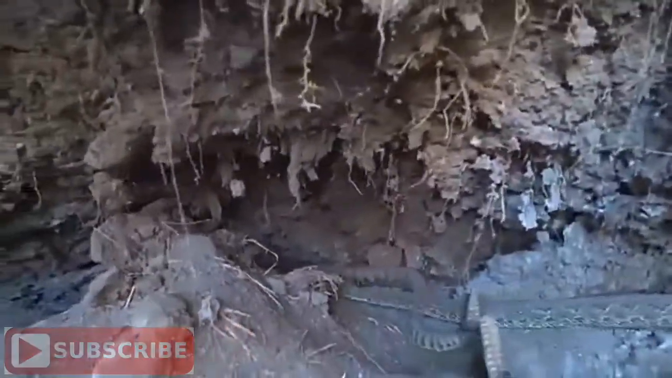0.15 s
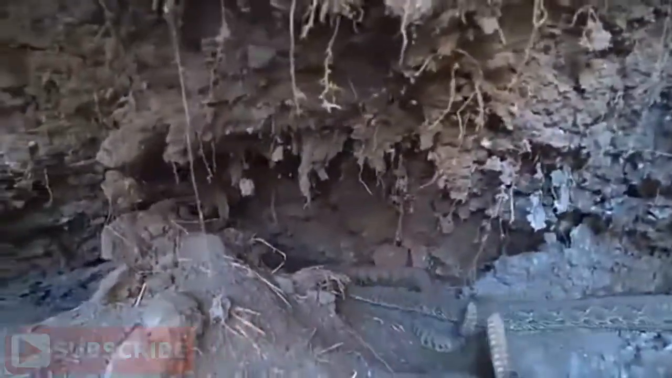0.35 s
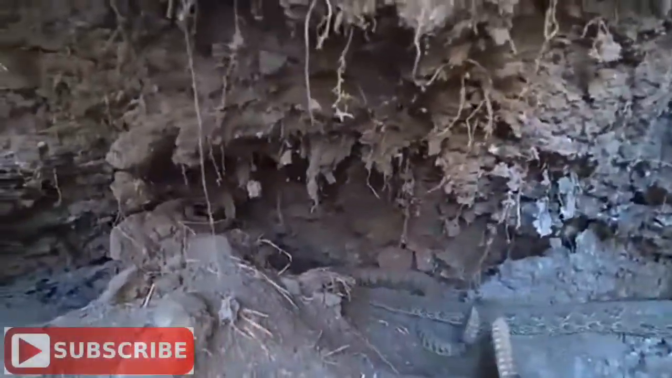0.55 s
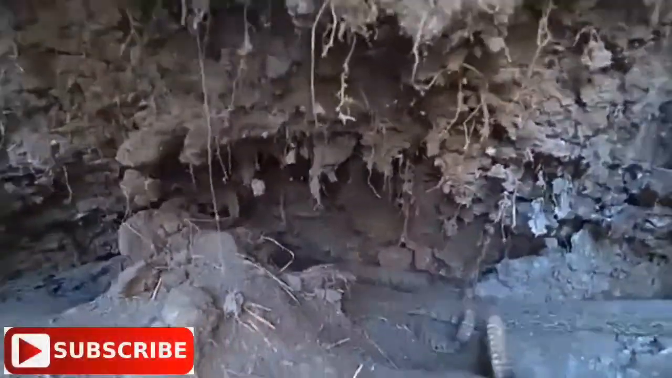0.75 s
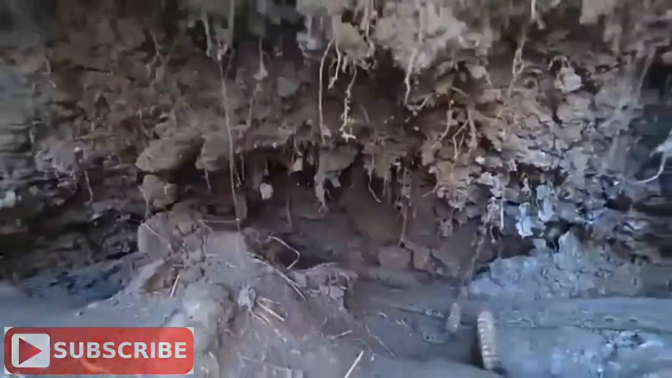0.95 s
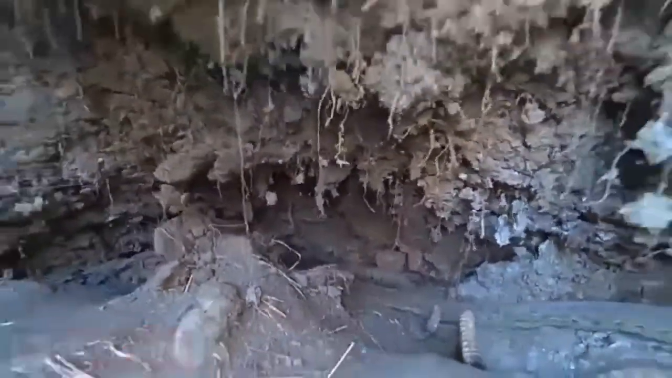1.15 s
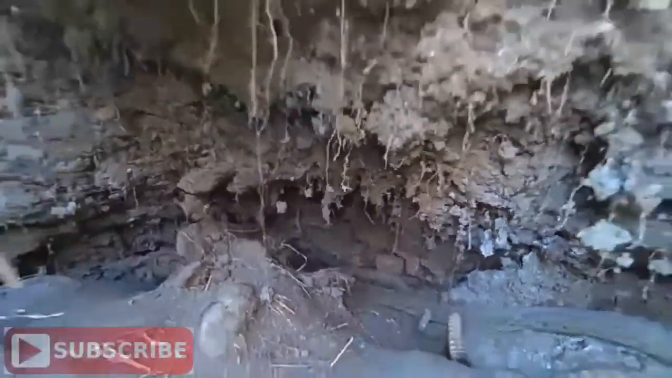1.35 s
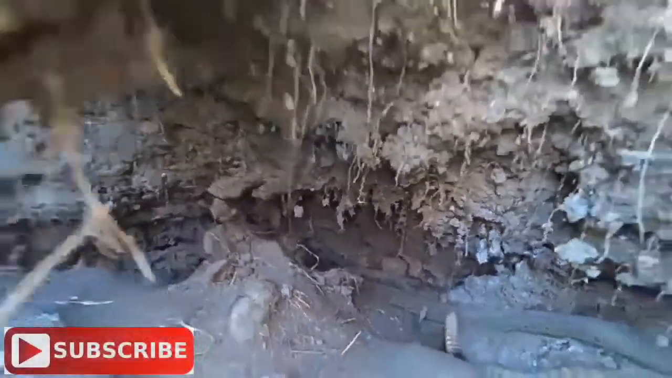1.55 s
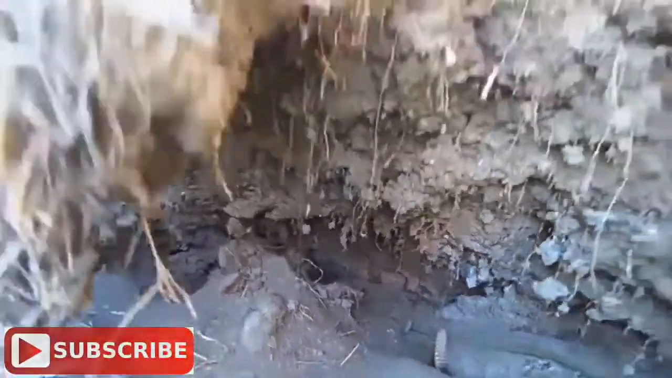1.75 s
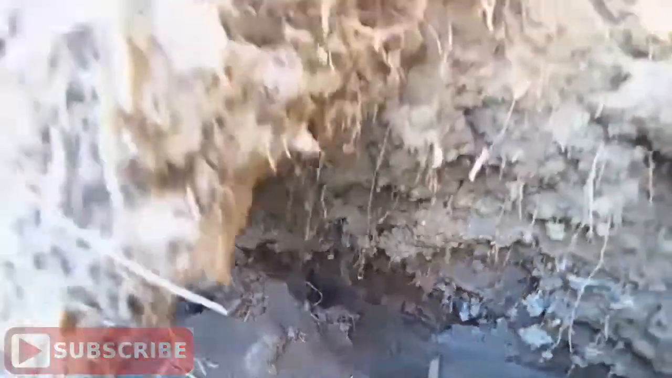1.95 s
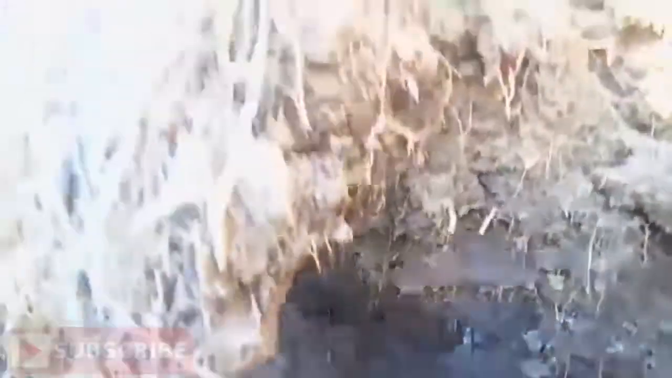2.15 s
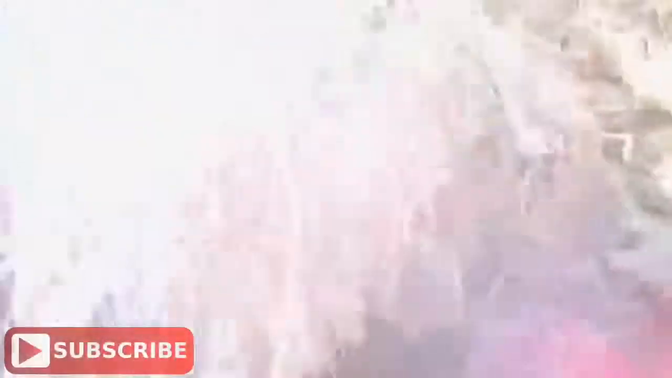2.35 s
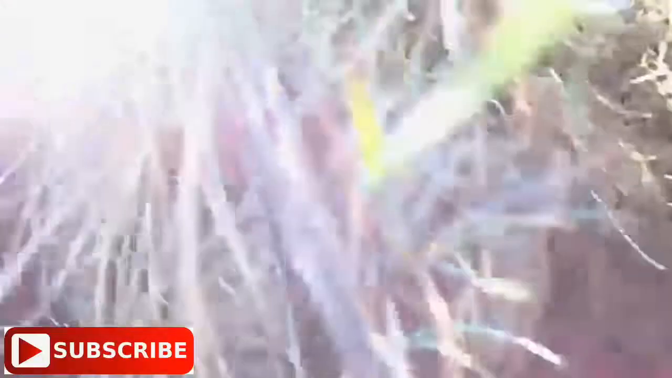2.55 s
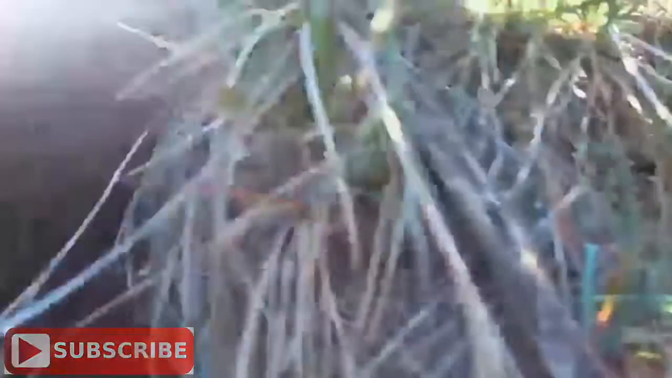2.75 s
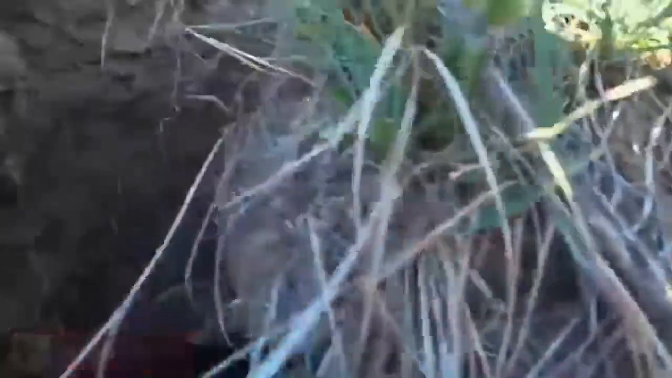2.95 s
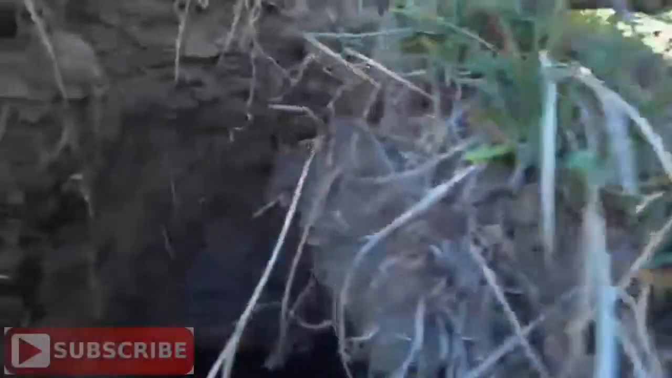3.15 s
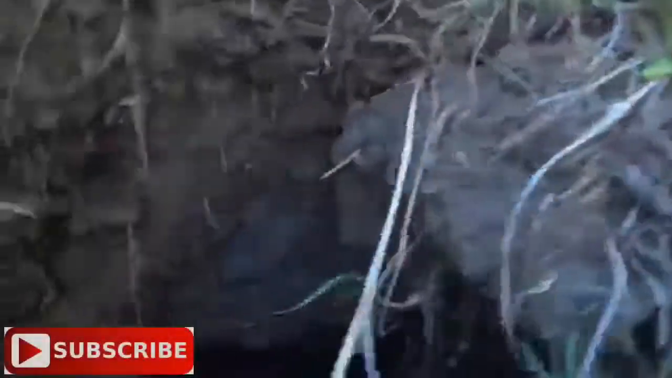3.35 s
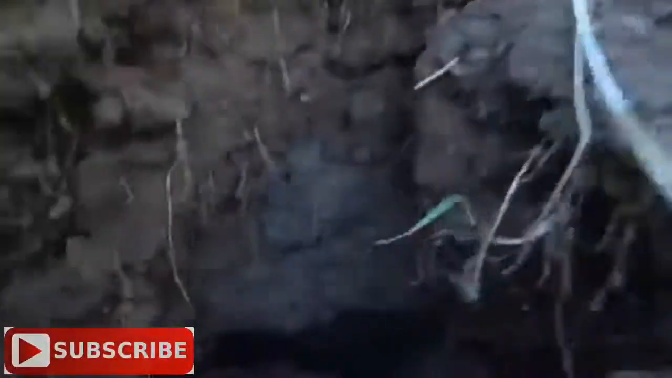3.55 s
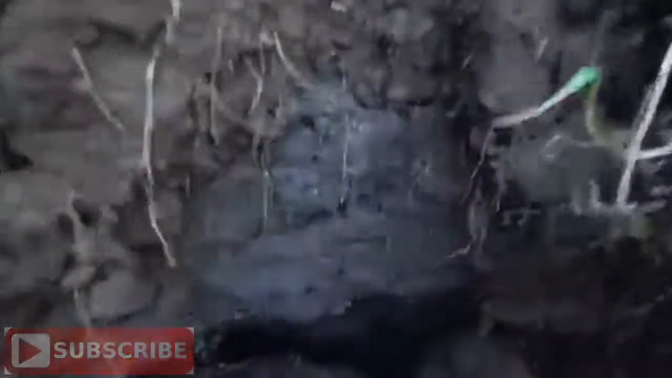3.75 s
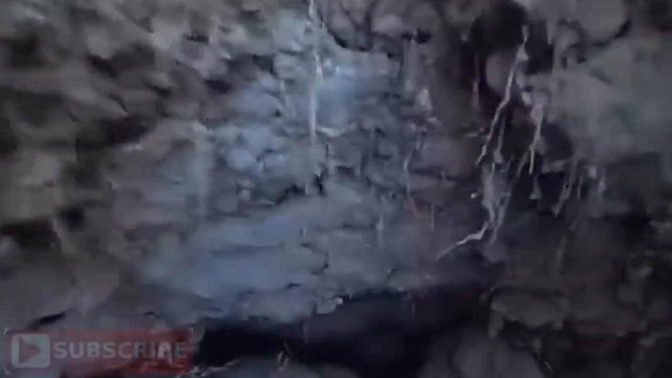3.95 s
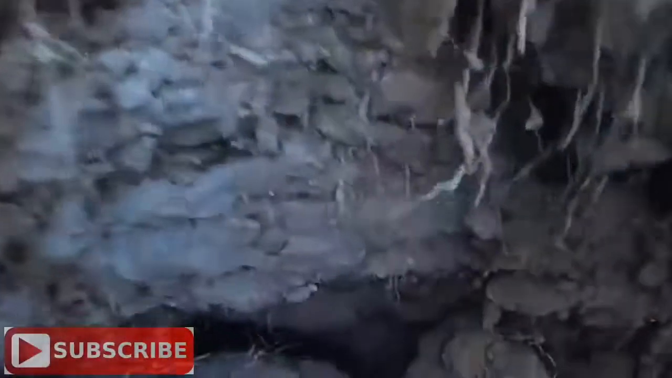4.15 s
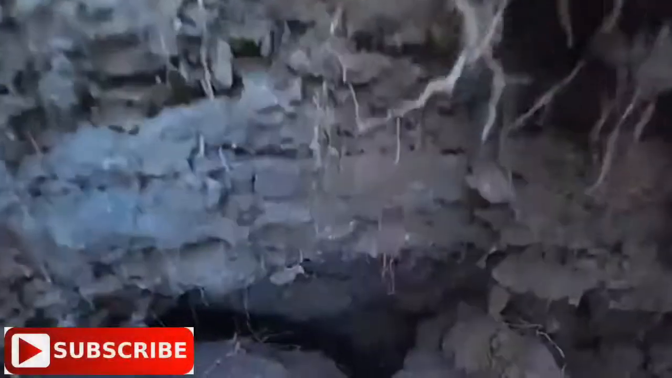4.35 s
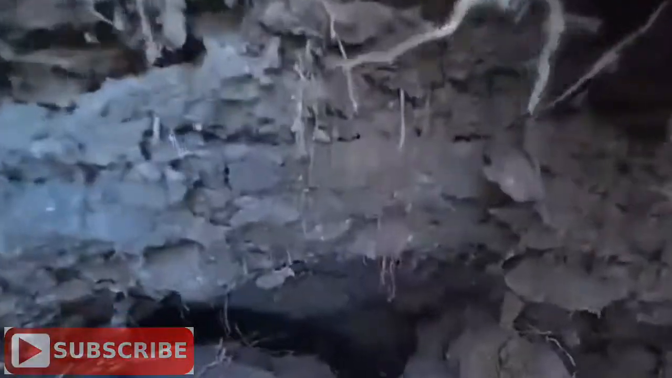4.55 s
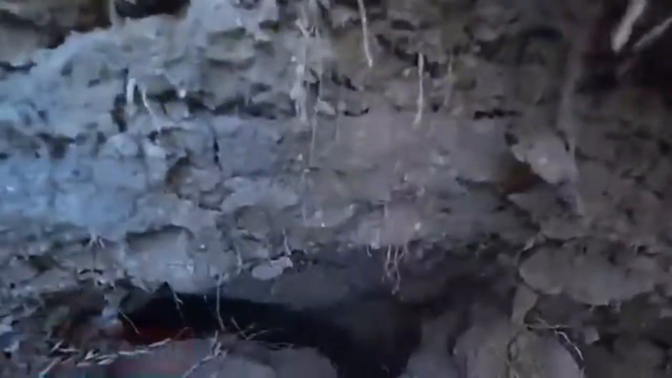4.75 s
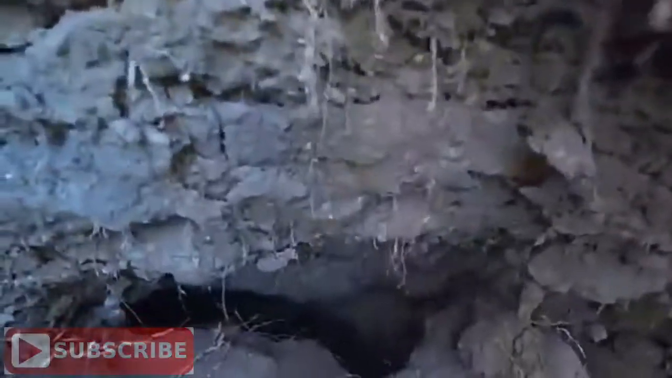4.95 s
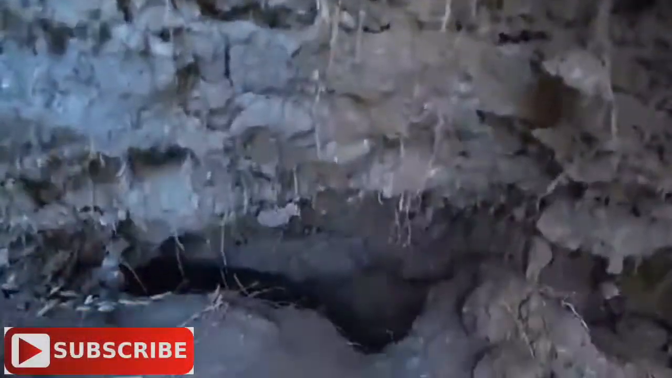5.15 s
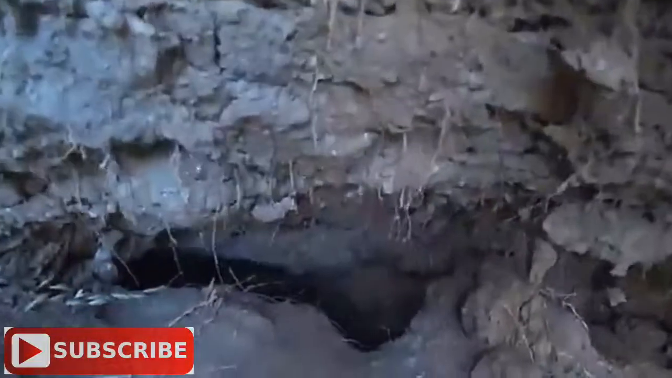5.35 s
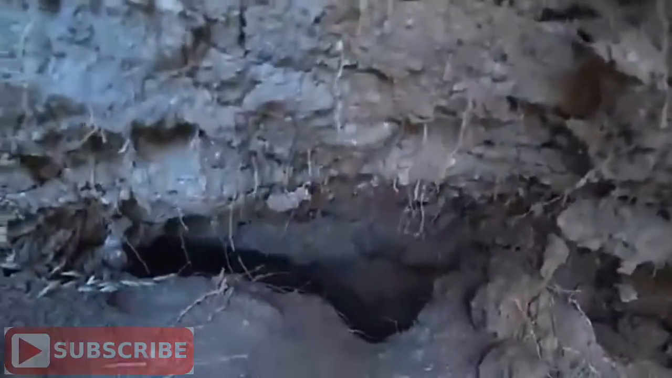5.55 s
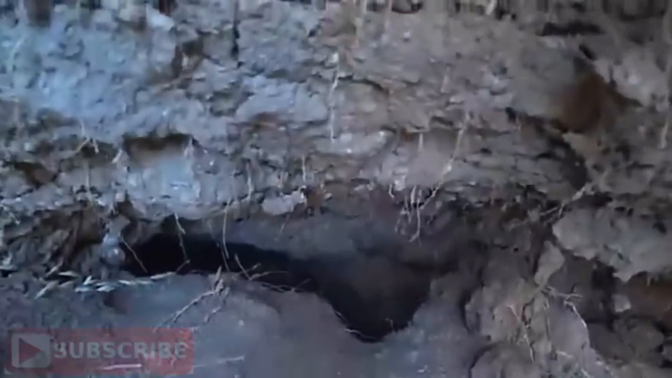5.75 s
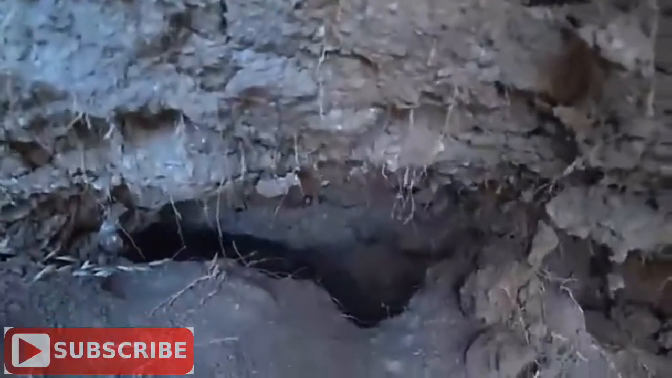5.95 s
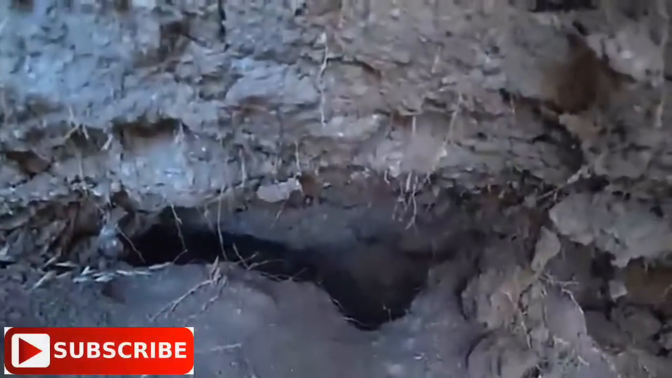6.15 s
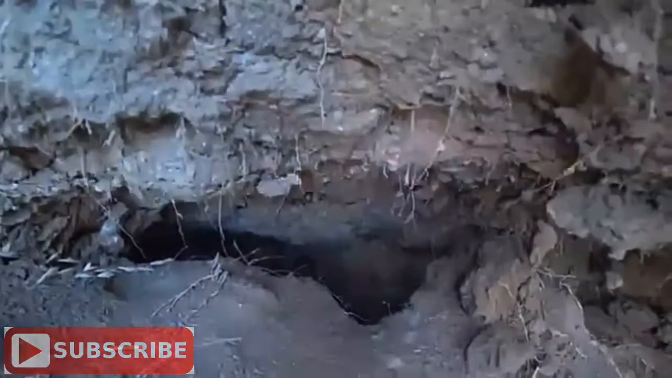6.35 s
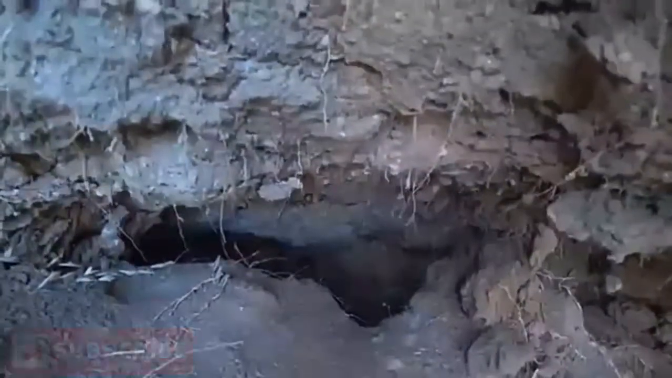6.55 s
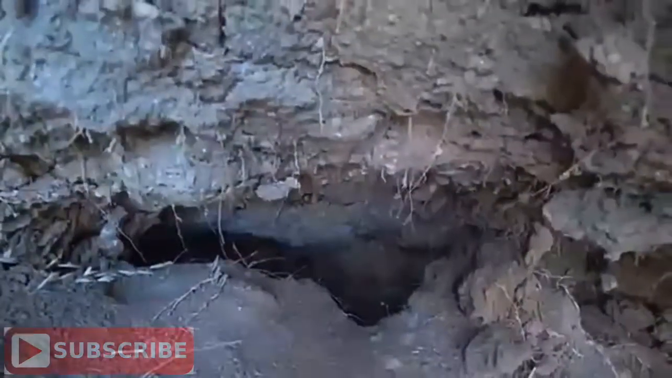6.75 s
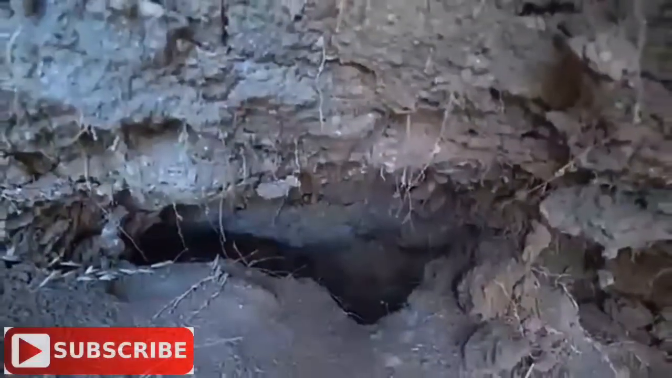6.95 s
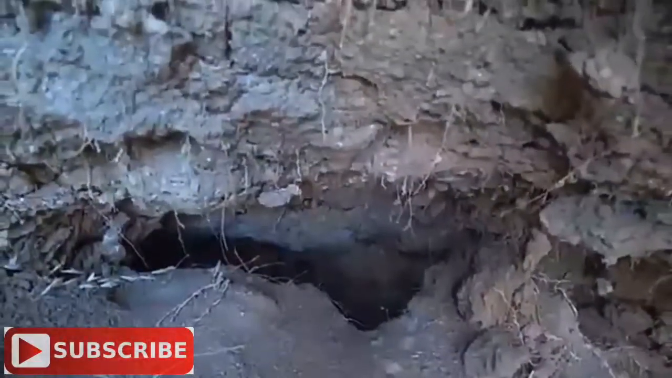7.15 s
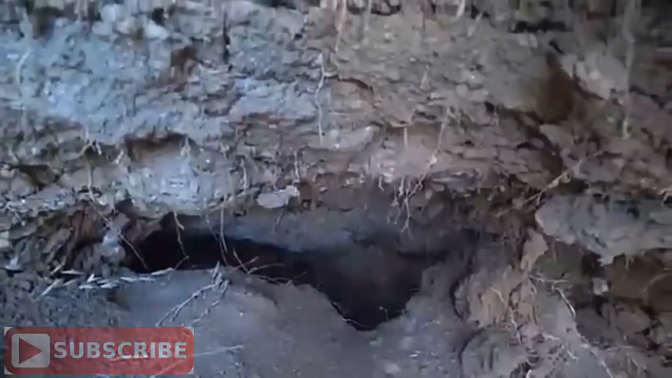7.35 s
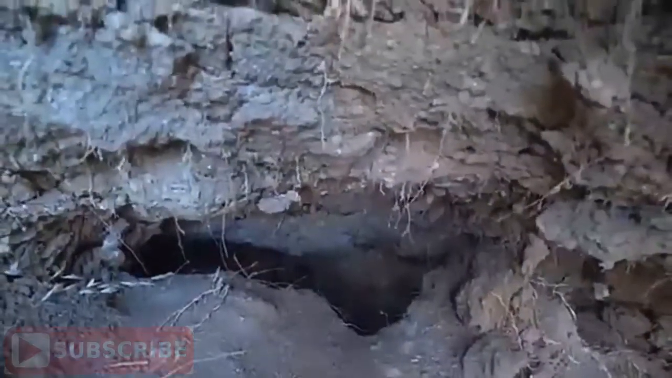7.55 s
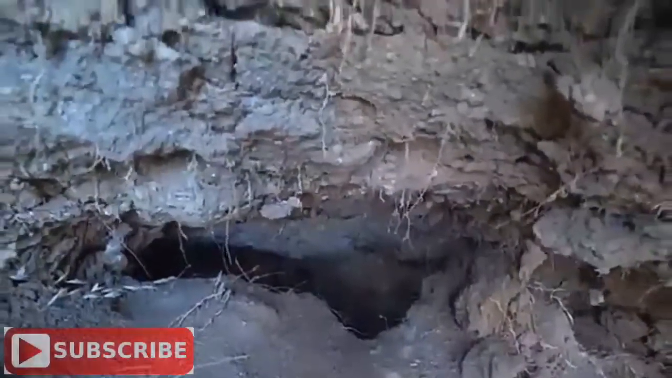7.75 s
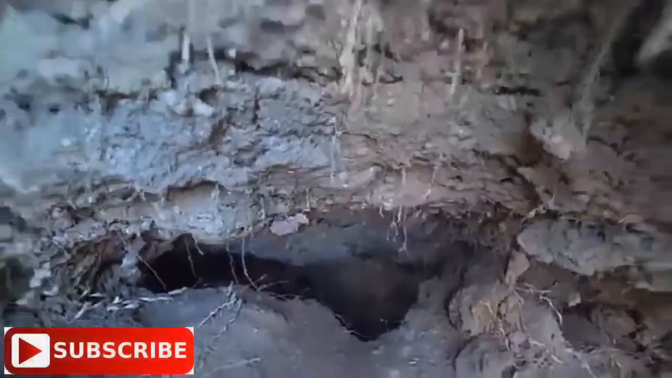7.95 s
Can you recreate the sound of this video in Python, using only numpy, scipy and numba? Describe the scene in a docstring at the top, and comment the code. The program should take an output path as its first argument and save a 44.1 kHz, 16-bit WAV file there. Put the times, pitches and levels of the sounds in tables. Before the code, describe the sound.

A handheld camera's microphone catches a rattlesnake in a dirt hollow: a bright, sizzling rattle, uneven at first. Skin rubs and a solid thump on the camera precede an abrupt fade, leaving weak, broken buzzing and a few snaps. The rattle returns stronger and more even, accompanied by a cluster of soft knocks, and continues almost unbroken, with a few more bumps late on. Quiet open-air rumble throughout.

```python
"""A ragged, throbbing rattlesnake buzz is heard first, from an earth hollow over a soft outdoor rumble.
It turns faint as the camera swings away, then steady from a new angle. Each tail stroke bunches the clacks of
the horn segments, which excite resonant shells; a ground echo and gliding notches colour the sum. Fingers rub
and knock on the camera body: random slips and decaying modes. The rumble and a faint hiss are shaped noise."""
import sys
import numpy as np
from scipy import signal
from scipy.fft import rfft, irfft
from scipy.io import wavfile
from scipy.ndimage import uniform_filter1d, map_coordinates
from numba import njit

SR = 44100
rng = np.random.default_rng(int(sys.argv[2]) if len(sys.argv) > 2 else 0)


def store_pcm(level_fs):
    """Save levels as 16-bit WAV."""
    pcm = np.round(np.clip(level_fs, -1, 1) * 32767).astype(np.int16)
    wavfile.write(sys.argv[1], SR, np.atleast_2d(pcm).T)


def volts_from_db(level):
    """Convert decibel levels to linear amplitude ratios."""
    exponent = np.asarray(level, float) / 20
    return 10 ** exponent


N = 356328
T = np.arange(N) / SR

# outdoor noise spectrum, relative: frequency_hz, density_db
AIR_SPECTRUM = [(12, -43), (20, -6), (48, 2), (80, -7.5), (128, -4), (208, -11.5), (270, -9), (450, -20),
                (1000, -22.5), (1600, -29), (2200, -29.5), (3000, -44), (5700, -120)]
# stereo spread of the outdoor noise: frequency_hz, side_over_mid_db
AIR_SPREAD = [(30, -31), (60, -34), (120, -14.5), (250, -9.5), (500, 2), (1300, 4.5), (2400, 3.5)]
# slow swell of the rumble: time_s, gain_db
RUMBLE_SWELL = [(0, 0), (1, 2.5), (2.6, -1.5), (4, 1), (6, -1), (8.08, -2)]
# finger slides on the camera body, relative levels: start_s, length_s, scrape_db, scrape_hz, thrum_db
FINGER_SLIDES = [(1.074, 0.095, -53.5, 1350, -78), (1.192, 0.072, -45, 1280, -85),
                 (1.236, 0.11, -43, 1253, -53.5), (1.648, 0.054, -29, 1204, -31.5),
                 (1.731, 0.091, -37.5, 1150, -53), (1.851, 0.045, -35.5, 1234, -48),
                 (1.927, 0.12, -40, 1250, -47.5), (1.992, 0.042, -41.5, 1310, -41.5),
                 (3.737, 0.087, -104.5, 1250, -51), (4.039, 0.081, -51.5, 1280, -46),
                 (4.19, 0.046, -64, 1150, -45), (4.353, 0.095, -40.5, 1203, -49.5),
                 (4.467, 0.1, -43.5, 1190, -47.5), (4.564, 0.11, -41, 1213, -49.5),
                 (4.709, 0.1, -58, 1210, -48), (5.179, 0.077, -50.5, 1156, -52.5),
                 (5.32, 0.1, -61.5, 1150, -51.5), (5.459, 0.058, -53.5, 1145, -53),
                 (7.826, 0.073, -52.5, 1170, -47.5), (7.902, 0.051, -45, 1156, -45.5),
                 (7.978, 0.059, -44, 1200, -60)]
# knocks on the camera body: time_s, relative_level_db, brightness_db (gain of the upper three modes)
BODY_KNOCKS = [(1.661, -45, 8), (1.678, -19, -18), (1.764, -36.5, 8), (1.882, -40.5, 12.5),
               (2.027, -34, -38), (3.755, -39.5, -30), (3.902, -28.5, -16.5), (4.004, -32, -23),
               (4.078, -31, -17), (4.169, -30.5, -11.5), (4.207, -29, -16.5), (4.315, -27, -15.5),
               (4.653, -28.5, -17), (4.733, -32, -11.5), (4.797, -30, -30), (5.782, -43, -17),
               (5.831, -36.5, -24), (5.928, -39, -44), (5.961, -36.5, -49), (7.942, -37, -2)]
# modes of the camera body: frequency_hz, relative_level_db, t60_s
BODY_MODES = [(101, 6, 0.075), (260, -13, 0.95), (382, 10.5, 0.023), (807, 4.5, 0.033), (1150, 13, 0.036),
              (1590, 1, 0.033)]
# centres of the panel resonances: frequency_hz
PANEL_CENTRES = [1060, 1150, 1255, 1320]
# lone bright ticks while the buzz is faint: time_s, relative_level_db
LONE_TICKS = [(2.4703, -33), (2.5094, -38), (2.614, -36), (2.6354, -39), (2.6604, -34), (2.7097, -37),
              (3.1652, -36), (3.4265, -29)]
# overall buzz, before the brief dips: time_s, level_db
BUZZ_LEVEL = [(0, -24.5), (.4, -24.5), (1.05, -27), (1.7, -27.5), (2.2, -26.5), (2.31, -30.5),
              (2.325, -39.5), (2.42, -39), (2.53, -61), (2.66, -51), (2.75, -37), (2.93, -37), (3.06, -44),
              (3.45, -37.5), (3.8, -28), (4.3, -26), (6.5, -25), (8.08, -27.5)]
# tail motion: time_s, strokes_per_s, bunching_share (0-1), alternation_db (up and down on alternate strokes)
TAIL_STROKES = [(0, 104, .25, 1.5), (3, 101, .3, 1), (3.6, 106, .3, 2), (4.3, 109.8, .7, 1),
                (4.8, 109.8, .7, 1.8), (5.25, 107.6, .5, 3), (5.7, 108.8, .7, .7), (6.5, 111.6, .8, .5),
                (7.4, 108.6, .9, .4), (8.08, 108.8, .85, .5)]
# brief dips of the buzz: time_s, depth_db, width_ms
BUZZ_DIPS = [(0.012, 8.5, 27), (0.084, 5.5, 37), (.23, 3.5, 58), (0.299, 3.5, 36), (0.161, 7.5, 29),
             (0.375, 7, 29), (.46, 3.5, 40), (.671, 3, 29), (1.0, 6, 13), (1.088, 7.5, 31),
             (1.215, 5.5, 21), (1.298, 6.5, 32), (1.471, 9.5, 28), (1.557, 9.5, 27), (1.631, 5, 19),
             (1.869, 5.5, 19), (1.992, 7.5, 16), (2.062, 9.5, 43), (2.145, 7.5, 41), (2.237, 5.5, 54),
             (2.688, 13, 52), (2.793, 10, 21), (2.855, 10.5, 58), (2.963, 9, 25), (3.056, 6.5, 81),
             (3.16, 15, 12), (3.219, 6, 24), (3.398, 5.5, 53), (3.571, 17, 6.7), (3.61, 14, 10),
             (5.122, 8, 8.4), (5.359, 20, 7.1), (5.397, 8.5, 7.7), (5.434, 17, 7.5)]
# hollow horn segments as resonators: frequency_hz, width_hz, relative_level_db
HORN_SHELLS = [(3400, 1840, -14.5), (5010, 1570, 5), (6390, 2340, 5), (8010, 2340, 5), (9560, 2770, 5.5),
               (11600, 5600, 4)]
# notches gliding as the camera moves, perhaps wall reflections: start_s, start_hz, end_s, end_hz
GLIDING_NOTCHES = [(0, 6600, .55, 5650), (.4, 5600, 1.4, 5850), (1.3, 5800, 1.75, 7600),
                   (1.75, 5300, 2.3, 5800), (1.7, 7400, 2.35, 8000), (2.5, 2900, 3.05, 4500),
                   (2.7, 7000, 2.9, 9200), (3.05, 5300, 4.15, 9400), (3.1, 7900, 3.55, 11000),
                   (3.1, 2550, 4.15, 6400), (4.1, 6300, 4.7, 7500), (4.4, 7700, 6.6, 9200),
                   (6.45, 9150, 7.4, 10800), (5.15, 5350, 7.1, 5750), (6.95, 5700, 7.9, 6600),
                   (6.6, 7300, 7.7, 8100), (3.9, 2400, 5.0, 3300), (5.0, 2600, 7.3, 2900),
                   (7.1, 2750, 8.08, 3700)]
# where the camera stands: time_s, lowest_shell_gain_db, echo_lag_ms
CAMERA_VIEW = [(0, 19.5, 0.043), (.45, 14.5, 0.11), (1.3, 14, 0.11), (1.8, 10.5, 0.064), (2.3, 11.5, 0.054),
               (2.55, 17.5, 0.15), (3.1, 9.5, 0.17), (3.5, 13, 0.21), (3.85, -1, 0.21), (4.4, -13, 0.19),
               (5.2, -8, 0.19), (5.9, -8, 0.13), (6.4, -5, .25), (7.4, -20, .21), (8.08, 7, 0.15)]
# port difference while the snake is off to one side: time_s, gain_db
SIDE_OFFSET = [(1.08, -19), (1.35, -21), (2.4, -23), (2.7, -2), (3.1, -16), (3.3, -19), (3.6, -30)]
# second shell, lower when seen from the side: time_s, pitch_ratio
SECOND_SHELL_PITCH = [(0, 1), (1.3, .98), (1.5, .89), (2.2, .9), (2.5, 1), (3.1, .95), (3.7, .9),
                      (4.1, .97), (4.6, 1), (8.08, 1)]


def level(x, db):
    """Root-mean-square scaling: sets the mean power."""
    return x * volts_from_db(db) / np.sqrt(np.mean(x ** 2))


def curves(rows):
    """Linear interpolation: each column of a timed table becomes a curve."""
    s, *columns = np.transpose(rows)
    return [np.interp(T, s, c) for c in columns]


@njit
def svf(x, hz, width):
    """State-variable resonance: a band-pass with moving centre and unit gain there."""
    y, b, l = np.empty(len(x)), 0., 0.
    for i in range(len(x)):
        g, k = np.tan(np.pi * hz[i] / SR), width / hz[i]
        v = (b + g * (x[i] - l)) / (1 + g * (g + k))
        b, l, y[i] = 2 * v - b, l + 2 * g * v, k * v
    return y


def band(x, hz, width_hz):
    """Cascaded resonance: two equal band-passes steepen the skirts."""
    hz = np.full(N, 1. * hz)
    once = svf(x, hz, 1. * width_hz)
    return svf(once, hz, 1. * width_hz)


def clicks(per_s, spread_db):
    """Random impulse process: clicks of either sign, many small and few large."""
    chance, sign, size = rng.random((3, N))
    present = chance < per_s / SR
    return present * np.sign(sign - .5) * volts_from_db(-spread_db * np.log(size + 0.008))


def walk(per_s):
    """Sample-and-hold fluctuation: random levels held 1 / per_s seconds and slewed."""
    hold = int(SR / per_s)
    return uniform_filter1d(np.repeat(rng.standard_normal(N // 100), hold)[:N], size=hold // 2)


def air():
    """Filtered noise: outdoor rumble and hiss, alike on both ports in the bass, unlike higher up."""
    log_hz = np.log(np.fft.rfftfreq(N, 1 / SR) + 1)

    def spectral_gain(table):
        hz, db = np.transpose(table)
        return volts_from_db(np.interp(log_hz, np.log(hz), db))

    mid, side = rfft(rng.standard_normal((2, N))) * spectral_gain(AIR_SPECTRUM)
    mid_wave = irfft(mid, N)
    side_wave = irfft(side * spectral_gain(AIR_SPREAD), N)
    scale = volts_from_db(-51.5) / np.std(mid_wave)
    held = np.repeat(rng.standard_normal(N // 4000 + 1), 4000)[:N]
    gust_db = 1.5 * uniform_filter1d(held, size=8000)
    gust = volts_from_db(curves(RUMBLE_SWELL)[0] + gust_db)
    return scale * gust * (mid_wave + np.array([[1], [-1]]) * side_wave)


def hiss():
    """Broadband noise: a faint even hiss shaped by one wide resonance."""
    return level(band(rng.standard_normal(N), 7600, 18000), -56)


def slide(start, length, t60):
    """Exponential decay: a 14 ms linear rise, a hold and a fading release."""
    rise = np.clip((T - start) / 0.014, 0, 1)
    return rise * volts_from_db(-60 * np.clip(T - start - length, 0, None) / t60)


def rubs():
    """Stick-slip friction: irregular slips of skin excite panel resonances and a low thrum."""
    panel_width_hz, panel_reach_hz, rasp_db_per_hz = 95, 65, 0.1652
    grip, scrape_hz = volts_from_db(2.4 * walk(90)), curves(FINGER_SLIDES)[2]
    slips = [grip * clicks(per_s=1200, spread_db=2.8) for _ in range(3)]
    # a slower, lower slide rasps more broadly
    rasp = volts_from_db(rasp_db_per_hz * (1197 - scrape_hz)) * level(band(slips[1], 660, 1000), -4)
    # the slide favours the panel resonances nearest its own pitch
    panel = 0
    for hz in PANEL_CENTRES:
        nearness = volts_from_db(-((hz - scrape_hz) / panel_reach_hz) ** 2)
        panel = panel + nearness * band(slips[0], hz, panel_width_hz)
    scrape = level(panel, 0) + rasp
    scrape += level(band(slips[2], 1660, 220), -28) + level(band(slips[1], 1970, 280), -21)
    push = clicks(per_s=330, spread_db=1.5)
    thrum = level(band(push, 260.5, 52) + band(push, 304, 87), 0)
    out = np.zeros(N)
    for s, length, scrape_db, _, thrum_db in FINGER_SLIDES:
        out += volts_from_db(scrape_db) * scrape * slide(s, length, t60=0.1)
        out += volts_from_db(thrum_db) * thrum * slide(s, length, t60=0.3)
    return out


def knocks():
    """Modal decay: each knock rings the body modes, then bounces once at half strength."""
    out, t = np.zeros(N), T[:4000]
    chance = rng.standard_normal((len(BODY_KNOCKS), len(BODY_MODES)))
    for (s, db, bright_db), detune in zip(BODY_KNOCKS, chance):
        ring = 0
        for (hz, mode_db, t60), d in zip(BODY_MODES, detune):
            decay = np.exp(-np.log(1000) * t / t60)
            tone = np.sin(2 * np.pi * hz * (1 + 0.076 * d) * t)
            ring = ring + volts_from_db(mode_db + bright_db * (hz > 600)) * decay * tone
        ring = ring + .5 * np.interp(t - .009, t, ring, left=0)  # the bounce, 9 ms later
        i = int(s * SR)
        out[i:i + len(t)] += volts_from_db(db - 8.5) * ring[:N - i]
    return out


def handling():
    """Phase difference: body-borne rubs and knocks, band-limited, reach the two ports out of step."""
    hand = signal.sosfilt(signal.butter(4, 2500, fs=SR, output="sos"), rubs() + knocks())
    hand = signal.sosfilt(signal.butter(2, 170, "high", fs=SR, output="sos"), hand)
    phase_rad = 0.99  # backward on one port, forward on the other
    turn = np.array([[volts_from_db(0.7) * np.exp(-1j * phase_rad)], [volts_from_db(-1.3) * np.exp(1j * phase_rad)]])
    return volts_from_db(4.5) * np.real(signal.hilbert(hand) * turn)


def ticks():
    """Impulsive noise: short dry snaps with a brief hissing decay."""
    out, t = np.zeros(N), T[:600]
    for (s, db), noise in zip(LONE_TICKS, rng.standard_normal((len(LONE_TICKS), len(t)))):
        i = int(s * SR)
        out[i:i + len(t)] += volts_from_db(db) * noise * volts_from_db(-60 * t / 0.024)
    return band(out, 9000, 14000)


def tail_strokes():
    """Periodic excitation: one hard clack a stroke, with clatter swelling around it."""
    rate, bunch, alternation_db = curves(TAIL_STROKES)
    stroke = np.cumsum(rate) / SR
    number = stroke.astype(int)
    chance = rng.standard_normal((N // 100, 3))
    ragged_db = 1.6 * (1 - bunch) ** 2 * chance[number, 0]
    force = volts_from_db(alternation_db * (-1.) ** number + ragged_db)
    # the slack closes at the turn of the stroke
    swing = 1 + 0.6 * bunch * np.cos(2 * np.pi * (stroke - .5))
    struck = stroke - number > .52 + .05 * chance[number, 1]
    onset = np.diff(struck, prepend=False) & struck
    clack = bunch * volts_from_db(0.5 * chance[number, 2]) * onset
    return bunch, force * swing, clack


def shells(low_db, shade_db):
    """Forced resonance: shared clacks ring every shell, and each shell has clicks of its own."""
    bunch, drive, clack = tail_strokes()
    crowd = 3200 + 2600 * bunch  # clicks per s: a ragged shake makes fewer, lonelier ones
    shared = .3 * clicks(per_s=crowd, spread_db=2.0) + volts_from_db(15) * clack
    out = 0
    pitches = [1, curves(SECOND_SHELL_PITCH)[0], 1, 1, 1, 1]
    angles_db = [low_db, 0, 0, 0, shade_db / 2, shade_db]
    for (hz, width, shell_db), pitch, angle_db in zip(HORN_SHELLS, pitches, angles_db):
        hits = drive * (shared + clicks(per_s=crowd, spread_db=5.5))
        # the hollow blurs part of it into an even rustle
        hits = hits + volts_from_db(-6.5 + hz / 2600 + 0.69 * shade_db) * rng.standard_normal(N)
        # in a ragged shake each shell flickers on its own
        flicker_db = 1.3 * (1 - bunch) * walk(per_s=35)
        out = out + volts_from_db(angle_db + flicker_db) * level(band(hits, hz * pitch, width), shell_db)
    # the dull underside of the clacks, from the hits on the last shell
    thud = volts_from_db(0.37 * low_db) * level(band(hits, 2170, 1280), -22.0)
    return out, thud


def glide_notches(x):
    """Interference: subtracting a gliding band-pass leaves a moving notch in x."""
    for start, hz0, end, hz1 in GLIDING_NOTCHES:
        span = slice(int(max(start, 0) * SR), int(end * SR))
        along = np.linspace(0, 1, len(x[span]))
        depth = np.clip(0.73 * (1 + 0.19 * walk(12)[span]), 0, 1)
        fade = np.sqrt(np.abs(np.sin(np.pi * along)))
        x[span] -= depth * fade * svf(x[span], hz0 + (hz1 - hz0) * along, 220.0 + .11 * hz1)
    return x


def rattle():
    """Source and path: shell resonances pass a ground echo, gliding notches and level dips."""
    low_db, lag_ms = curves(CAMERA_VIEW)
    db = curves(BUZZ_LEVEL)[0]
    # behind the bank the buzz is fainter and its treble fades most
    shade_db = 0.54 * (db - db.max())
    out, thud = shells(low_db, shade_db)
    echo = map_coordinates(out, [np.arange(N) - lag_ms * SR / 1000], mode="nearest")
    out = glide_notches(out + 0.15 * echo)
    out = thud + signal.sosfilt(signal.ellip(4, 1, 30, 2550, "high", fs=SR, output="sos"), out)
    for s, depth_db, width_ms in BUZZ_DIPS:
        half_s = width_ms / 1000 / 2
        db = db - depth_db * np.exp(-np.abs((T - s) / half_s) ** 3.6)  # 3.6: squareness of the dip
    return level(out, 0) * volts_from_db(db)


def scene():
    """Superposition: the rattle is nearly alike on both ports, the handling out of step."""
    hand = handling()
    buzz = rattle() + ticks()
    # while the snake is off to one side the ports differ a little
    aside = volts_from_db(curves(SIDE_OFFSET)[0]) * (2 * band(buzz, 3360, 2440) + band(buzz, 12400, 5400))
    return buzz + np.array([[1], [-1]]) * aside + hand + air() + hiss()


def top_cut(x):
    """Nothing passes above the cut-off."""
    return signal.sosfilt(signal.butter(12, 16330, fs=SR, output="sos"), x)


def record(dry):
    """Low-pass filtering: the camera cuts the top sharply above 15 kHz."""
    mix = signal.sosfilt(signal.ellip(8, .2, 40, 15000, fs=SR, output="sos"), dry)
    return top_cut(mix)


dry = scene()
out = record(dry)
store_pcm(out)
```